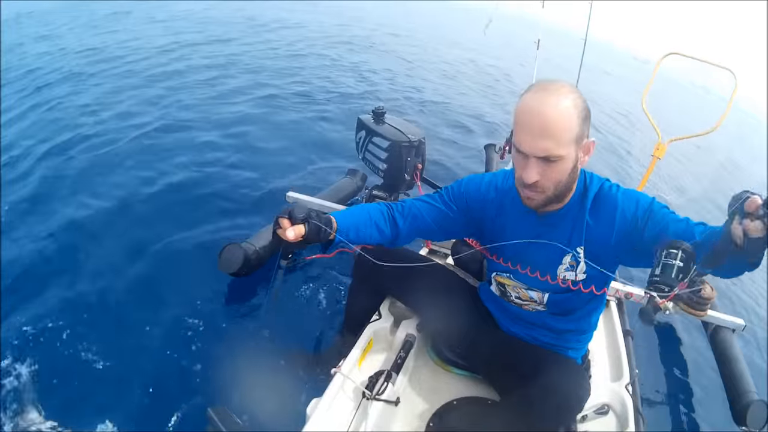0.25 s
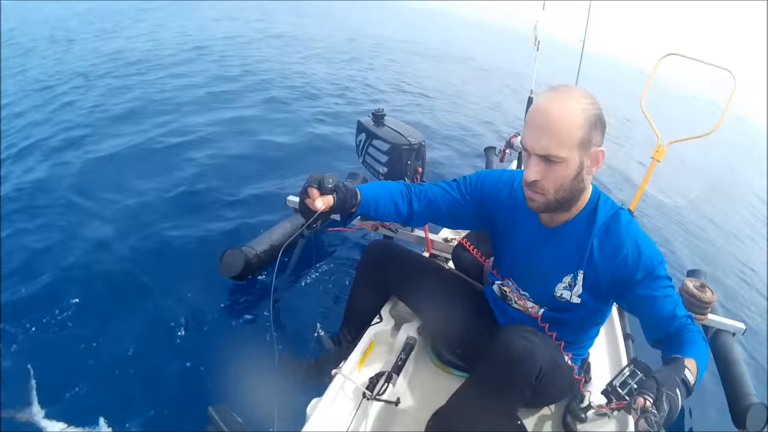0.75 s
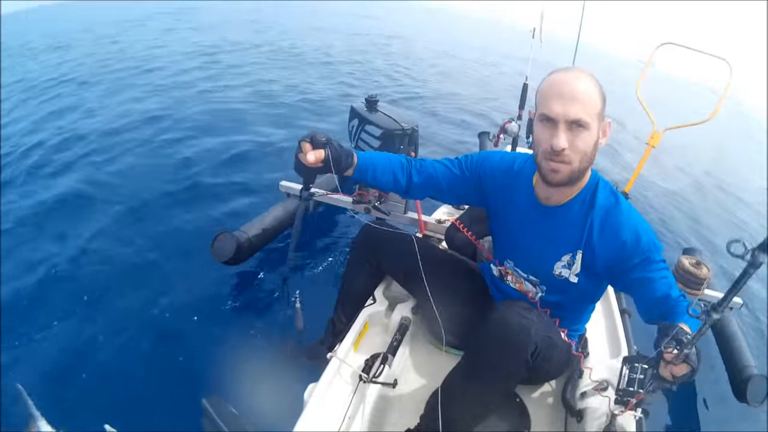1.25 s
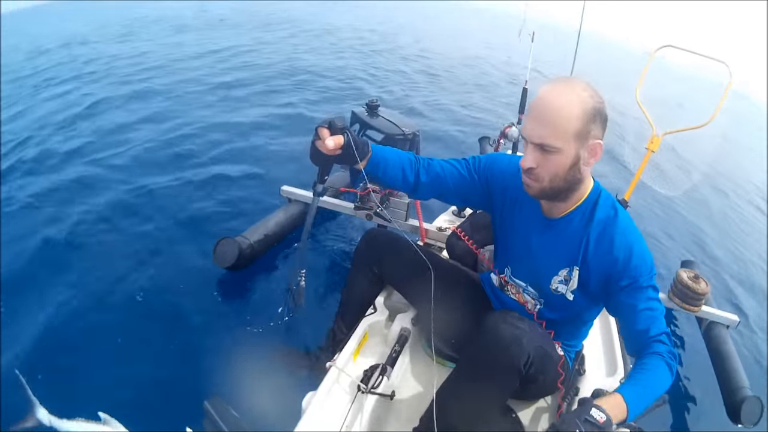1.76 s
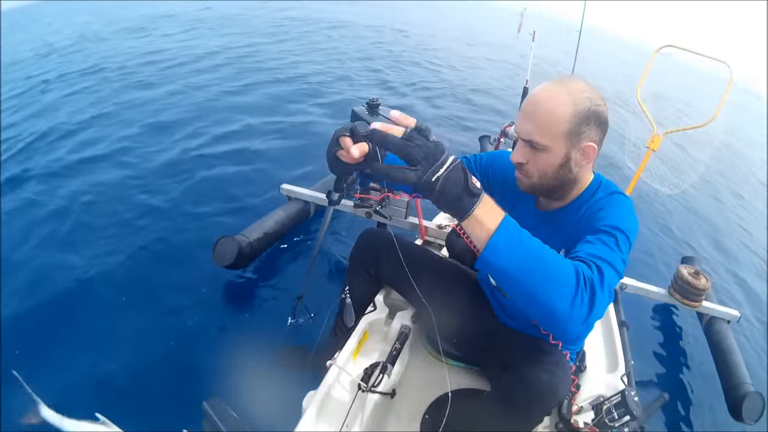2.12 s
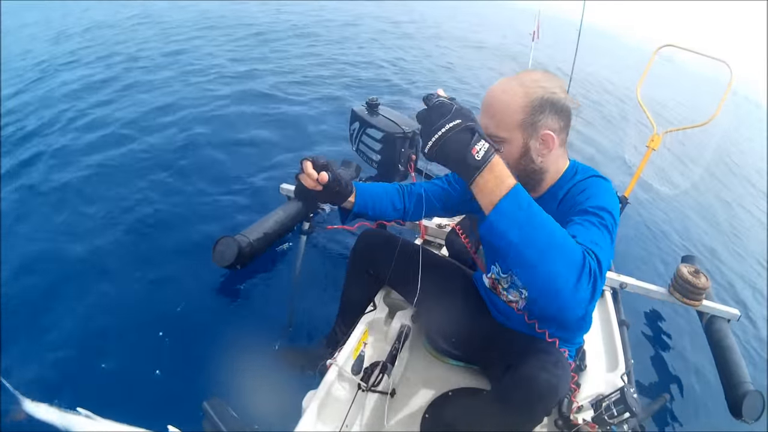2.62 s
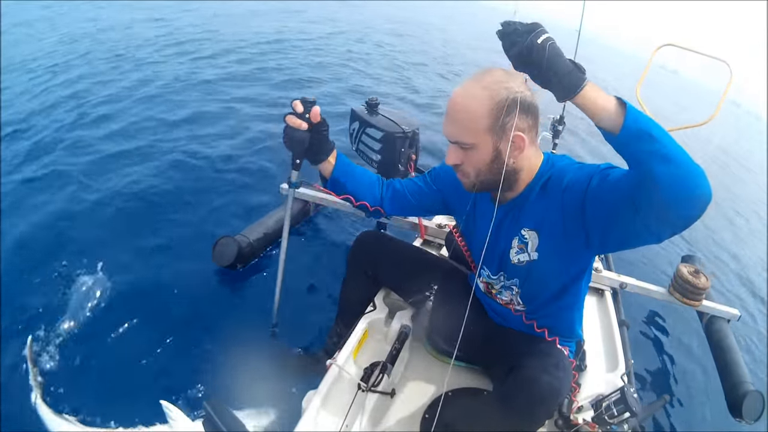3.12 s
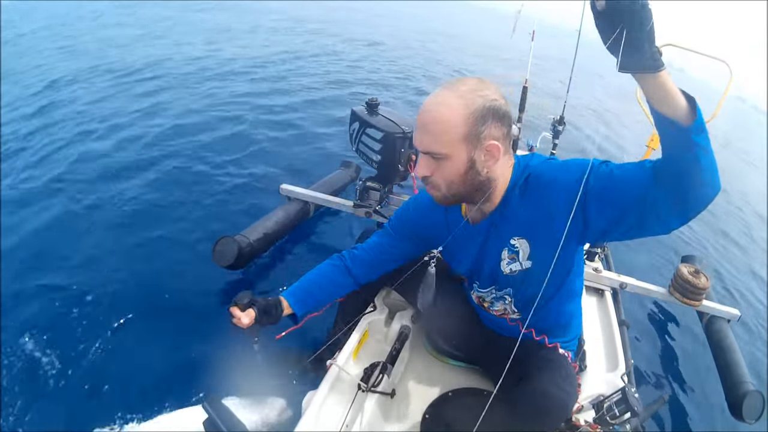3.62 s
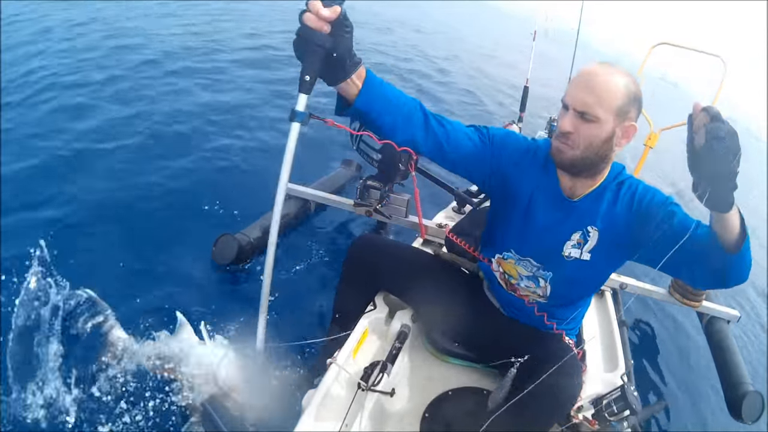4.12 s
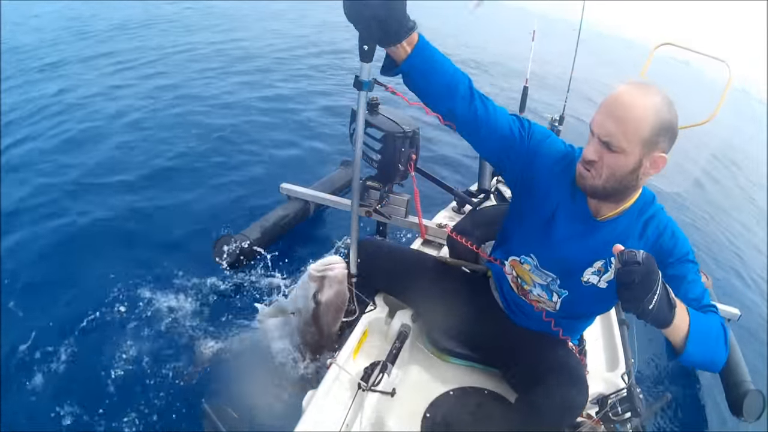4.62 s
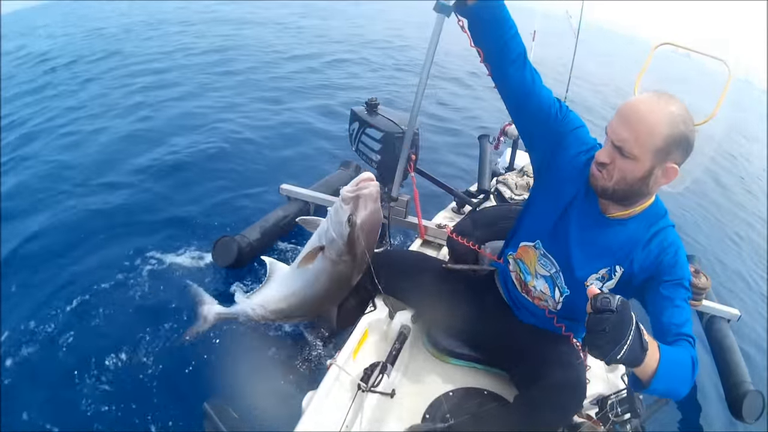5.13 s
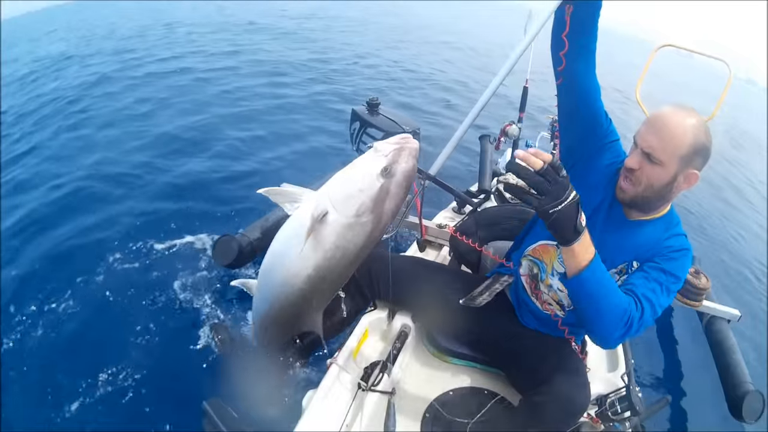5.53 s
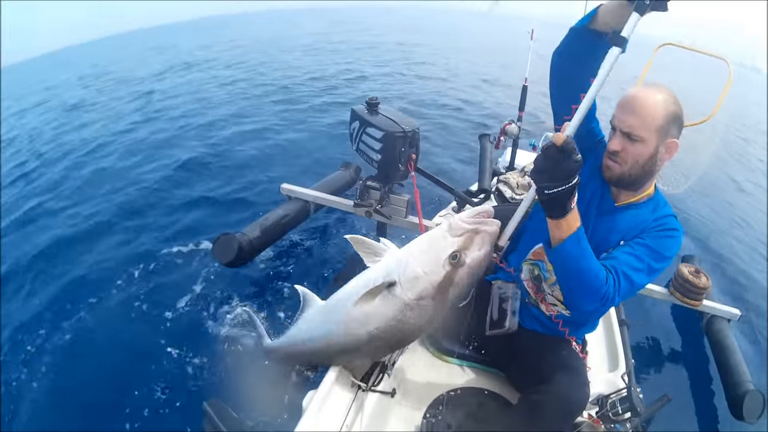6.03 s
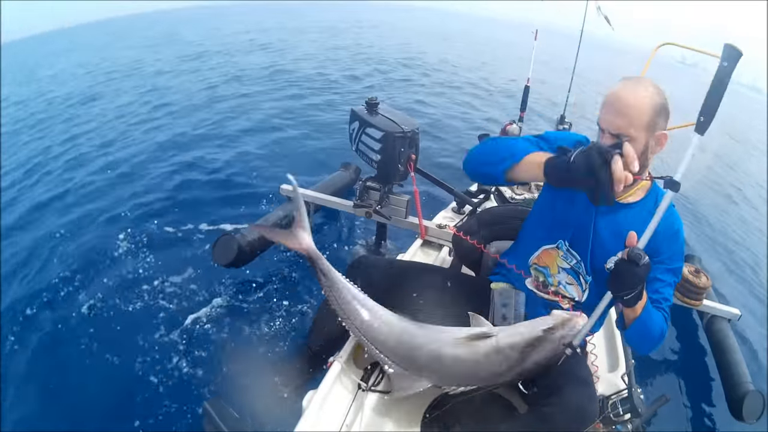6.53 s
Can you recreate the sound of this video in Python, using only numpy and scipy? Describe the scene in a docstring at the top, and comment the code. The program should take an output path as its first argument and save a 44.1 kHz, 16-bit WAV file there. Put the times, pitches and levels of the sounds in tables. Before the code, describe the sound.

A rod bangs harshly into its holder, clipping the microphone, then faint reel clicks give way to dull fish thumps and wet rubbing along a hollow hull.

```python
"""Rod and heavy fish on a kayak hull

A camera microphone, sealed in its housing on a plastic kayak, hears the hull through the mount.
Close by, a rod is banged into its holder, hard enough to overload the input, then its reel ratchet clicks faintly:
short rattles strike ringing modes. Gear rubs, then water and a heavy fish thump and drag along the hull:
single blows and streams of small slips. Most of it rings in the same hull modes, over low sway, faint squeaks
and a steady noise-band hiss of the electronics."""
import sys
import numpy as np
from scipy import signal
from scipy.io import wavfile

SR = 44100
rng = np.random.default_rng(int(sys.argv[2]) if len(sys.argv) > 2 else 0)


def decibels_to_gain(level_db):
    """Convert a level in decibels to a linear amplitude gain (20 dB per decade)."""
    exponent = np.asarray(level_db, float) / 20
    return 10 ** exponent


def transcribe(u):
    """Save the signal u as a 16-bit wav file named by the first command-line argument.

    u: samples, shape (n,) or (channels, n), limited to [-1, 1]; the rate is SR.
    q: integer samples, one column per channel.
    """
    v = np.clip(np.atleast_2d(u).T, -1, 1)
    q = np.round(v * 32767).astype(np.int16)
    wavfile.write(sys.argv[1], SR, q)


N = 298098   # length in samples

# slow rocking of the mount: start_s, level_db (straight lines between the points)
SWAY = [(0, -32.5), (0.35, -62.5), (0.55, -28), (0.8, -59), (0.95, -28), (1.2, -37), (1.45, -32.5),
        (1.9, -58), (2.4, -62.5), (3.82, -73), (3.95, -50.5), (4.3, -68.5), (6.76, -63.5)]
# faint whistles: start_s, end_s, pitch_hz, level_db (rms at the middle of the swell)
SQUEAKS = [(5.28, 5.48, 3000, -72), (5.29, 5.39, 3300, -77), (5.53, 5.59, 2000, -60)]

# Modes of hull and mount, low to high: pitch_hz, level_db (relative), t60_s (at damping 1)
BOOM = [(91.4, -12, 0.26), (163.9, 4, 0.12), (209.5, -9, 0.14), (280.4, 1, .05), (414.7, -11.5, 0.02)]
RING = [(447.2, -11, 0.067), (469.4, -4, 0.11), (546, 8, 0.038), (620, -4, 0.053), (766, 10, 0.045),
        (921, -5, 0.019)]
CLACK = [(1251, -4.5, 0.051), (1398, -0.5, 0.045), (1485, 6, 0.024), (1696, 6.5, 0.024), (2040, -8.5, 0.04),
         (2374, -14, 0.023)]
CRACK = [(2655, 3.5, 0.008), (3400, -2.5, 0.017), (4200, -2.5, 0.013), (4648, 1.5, 0.0047),
         (6350, 0, 0.0027), (8900, -8.5, 0.0014), (13500, -13.5, 0.0029)]
# gear dragged over the deck: pitch_hz, level_db (relative), t60_s (at damping 1)
GEAR = [(2730, -5, .015), (3702, -2.5, 0.013), (4170, -6.5, .012)]
# the rod holder's own modes: pitch_hz, level_db (relative), t60_s (at damping 1)
HOLDER = [(220, 3, 0.18), (674.6, 7.5, 0.076), (2165, -6.5, 0.032)]

# strokes of gear, water and fish along the hull: start_s, length_s, ring_db, boom_db, clack_db
STROKES = [(0, 0.036, -48, -33, -44.5), (0.045, 0.25, -61, -49.5, -60.5), (0.431, 0.021, -37, -32.5, -40),
           (0.534, 0.27, -35.5, -36.5, -41), (0.817, 0.49, -46, -35, -57), (1.36, 0.19, -55.5, -39, -59),
           (1.578, 0.269, -39, -35, -38.5), (1.942, 0.33, -47, -49, -52), (2.492, 0.14, -62, -35.5, -85),
           (2.735, 0.19, -75.5, -56.5, -91), (3.302, 0.32, -59, -62, -67), (3.88, 0.061, -59, -45, -69),
           (3.998, 0.25, -54, -49, -55.5), (4.308, 0.38, -54, -49, -61.5),
           (4.666, 0.089, -47.5, -32.5, -69), (4.834, 0.1, -49.5, -49.5, -64), (4.959, 0.14, -40, -34, -65),
           (5.22, 0.23, -44, -32.5, -61.5), (5.502, 0.12, -39, -34.5, -54), (5.643, 0.38, -48, -35, -62),
           (6.016, 0.37, -58, -42.5, -69), (6.356, 0.17, -54.5, -44.5, -67),
           (6.556, 0.18, -48.5, -41, -52.5)]
# dry scuffs that reach the highest modes: start_s, length_s, gear_db, edge_db
SCUFFS = [(0, 0.038, -51.5, -52), (0.55, 0.13, -43, -52.5), (0.743, 0.19, -59.5, -69),
          (0.929, 0.056, -43.5, -51), (1.587, 0.26, -50.5, -73), (1.657, 0.0053, -35.5, -50),
          (1.943, 0.31, -67, -91.5), (2.461, 0.03, -53, -66.5), (4.0, 0.28, -69, -89),
          (4.667, 0.024, -67.5, -77), (6.565, 0.17, -70, -81)]
# The next three hold one value for each of: boom, ring, clack, gear, sharp edge
# time to die to about a third after a stroke: fade_s
FADE_S = [0.038, 0.0077, 0.0094, 0.011, 0.011]
# calm water under everything: level_db
LAPPING_DB = [-61.5, -65, -81, -94, -100]
# scale of the unevenness of the slips: spread_db
UNEVEN_DB = [2.0, 3.2, 5.8, 6.5, 6.0]

# small hollow plops of water: start_s, peak_db
PLOPS = [(0.191, -29.5), (0.272, -39.5), (1.997, -36), (2.186, -29), (2.61, -37), (4.357, -34),
         (4.43, -35.5), (5.545, -29), (5.822, -31)]
# small dry ticks of reel and tackle, and the sharp edge of some hull blows: start_s, peak_db
TICKS = [(0.074, -41), (0.093, -40), (0.115, -43), (0.138, -39), (0.223, -36.5), (0.248, -41), (1.452, -27),
         (1.627, -26.5), (2.115, -38), (2.154, -41), (2.185, -49), (2.371, -43.5), (3.9256, -44.5),
         (4.361, -44.5), (4.41, -41), (4.487, -43.5), (4.529, -40), (4.676, -42), (4.689, -41.5),
         (4.588, -41), (5.364, -48), (5.596, -39), (5.745, -46)]
# blows and slaps on the hull: start_s, ring_peak_db, boom_peak_db, clack_peak_db, rattle_decay_ms
HULL_THUMPS = [(0.368, -43, -42, -48, 3), (1.696, -28, -17.5, -33, 0.24), (1.814, -24.5, -58, -21, 4.7),
               (1.843, -26.5, -20, -58, 23), (2.086, -21.5, -19, -23, 14.4),
               (2.426, -35.5, -40, -40.5, 2.4), (2.451, -17.5, -13, -28, 5), (2.527, -34, -20.5, -45, 3.7),
               (2.596, -35.5, -21.5, -42.5, 5.5), (2.687, -38, -25, -55, 6.4),
               (2.702, -38.5, -19.5, -63, 2.34), (3.02, -50.5, -48, -49, 3.3),
               (3.301, -46, -52.5, -50.5, 3), (3.845, -39.5, -52, -46, 4.5),
               (3.895, -43.5, -33.5, -49.5, 10), (4.014, -33, -32.5, -56, 4.3),
               (4.064, -35.5, -39, -39.5, 7.8), (4.114, -28.5, -50.5, -38.5, 6.5),
               (4.225, -55, -43.5, -46, 5.6), (4.336, -44, -47, -37, 1.8), (4.586, -16.5, -15, -21, 8.5),
               (4.657, -30, -17, -48.5, 5.5), (4.911, -37, -31.5, -62, 2.4),
               (4.961, -24.5, -24.5, -59, 2.6), (5.229, -27, -18, -35.5, 3), (5.262, -36, -30, -40, 5),
               (5.362, -20, -21, -38, 4.7), (5.594, -21, -18, -28.5, 4), (5.686, -34, -29.5, -45.5, 2.2),
               (5.744, -25, -19, -50, 4.3), (5.862, -18.5, -22, -66, 1.36), (5.947, -33, -33, -45, 3.4),
               (6.162, -35, -24, -47, 5.5), (6.367, -24, -16, -40, 18), (6.711, -26.5, -19, -45.5, 3.4)]
# the mount lurches: start_s, kick_db (start level of the dying sine)
LURCHES = [(0.516, -14), (0.579, -15.5), (0.623, -13), (0.941, 0), (1.087, -13.5)]
# single clear modes of rod or holder: start_s, pitch_hz, level_db (at the start, before flutter), t60_s
PINGS = [(.518, 645, -6.5, 0.13), (.53, 2150, -15, 0.19), (.664, 743, -2, 0.067), (.715, 631.5, -3.5, 0.11),
         (.992, 1530, -16.5, 0.046), (1.102, 1631, -2.5, 0.024), (1.135, 1563, 1, 0.033),
         (1.26, 1597, 2, 0.03), (1.261, 2010, -3, 0.019)]
# rod against holder, then from 1.32 s fainter clicks of the reel ratchet:
# start_s, ring_peak_db, clack_peak_db, crack_peak_db, rattle_decay_ms (scaled per family)
ROD_AND_REEL = [(0.428, -6.5, -3, -11, 2.85), (0.516, 0, 2.5, -0.5, 3.5), (0.532, -4, -1, -5, 4.2),
                (0.562, -9, -9, -34.5, 2.6), (0.575, 3.5, 5, -3.5, 4.3), (0.587, -3.5, 3, -9, 0.46),
                (0.596, -6.5, 3, -2.5, 0.25), (0.62, 5, 7.5, -6, 5.2), (0.639, -3.5, -11.5, -22.5, 6.6),
                (0.663, -6, 2, -12, 4.1), (0.714, 1, 7.5, -6.5, 3.8), (0.729, -4.5, -6.5, -17.5, 5.4),
                (0.828, -21, -18, -47, 6.6), (0.862, -28, -20.5, -35, 3.8), (0.876, 3, -0.5, -11, 5.1),
                (0.904, 2.5, 9, -8.5, 2.8), (0.917, -8, -3.5, -16.5, 4.2), (0.938, 5.5, -0.5, -16, 7.7),
                (0.95, 0.5, -5.5, -26, 9.4), (0.962, -4.5, -19.5, -37.5, 7.8),
                (0.991, -21.5, -27.5, -42.5, 6.9), (1.029, -32, -42, -32.5, 2.9),
                (1.075, -23.5, -21, -46, 5.4), (1.081, 1.5, -9.5, -17.5, 0.37),
                (1.09, -11, -2.5, -16.5, 1.9), (1.103, -8, -9.5, -16.5, 7.6),
                (1.135, -14.5, -8, -21.5, 7.6), (1.182, -31.5, -35.5, -38, 7.6),
                (1.196, -22, -22.5, -34, 7.6), (1.251, -23, -20.5, -34.5, 7.7), (1.26, -3, 7, -0.5, 0.98),
                (1.32, -35, -28, -30, 6.5), (1.343, -30, -26, -39, 2.7), (1.391, -24.5, -26, -29.5, 7.3),
                (1.466, -35.5, -27, -29, 9.3), (1.529, -35, -27.5, -30.5, 10),
                (1.577, -33.5, -29.5, -41.5, 4.9)]

MOUNT_LOW_HZ = 84   # the soft mount passes little of the modes below this
FIRST_TOUCH = 0.84   # first contact against the root energy of the whole rattle (ratio)
STROKE_ATTACK_S = 0.0091
LURCH_HZ, LURCH_T60_S = 64, 0.075
ROD_BOOM_DB, BOOM_LOST_PER_CLACK_DB = -4, 0.08   # boom against ring; a brighter knock booms less
HISS_DB, HISS_LOW_HZ, LOW_HISS_DB = -69.5, 1494, -68
OVERLOAD = 0.99   # input clips here (ratio of full scale)


def rms_one(x):
    """Scales a signal to an rms of 1."""
    return x / np.sqrt(np.mean(x ** 2) + 1e-20)


def band(x, low_hz, high_hz):
    """Keeps what lies between two frequencies."""
    return signal.sosfilt(signal.butter(2, [low_hz, high_hz], "band", fs=SR, output="sos"), x)


def drift(rate_hz):
    """Slow chance with rms 1: noise through a two-pole lowpass, its first second dropped."""
    r = np.exp(-2 * np.pi * rate_hz / SR)
    noise = rng.standard_normal(N + SR)
    return rms_one(signal.lfilter([1], [1, -2 * r, r * r], noise)[SR:])


def rings(modes, damping):
    """The dying sine of each mode, one row each, signs alternating, band-limited to the family's range."""
    hz, db, t60 = np.transpose(modes)[:, :, None]
    t = np.arange(SR // 3) / SR
    sines = decibels_to_gain(db - 60 * damping * t / t60) * np.sin(2 * np.pi * hz * t)
    signs = (-1) ** np.arange(len(modes))[:, None]
    kept = band(sines * signs, hz.min() * 0.7, hz.max() * 1.15)
    return band(kept, MOUNT_LOW_HZ, hz.max() * 1.25)


def blows(modes, times, peaks_db, decays_ms, damping):
    """Each blow is a short dying rattle that strikes the modes with strengths of its own."""
    shapes, out = rings(modes, damping), np.zeros(N + SR)
    t_ms = np.arange(SR // 20) * 1000 / SR
    for s, db, ms in zip(times, peaks_db, decays_ms):
        strengths = decibels_to_gain(3 * rng.standard_normal(len(modes)))
        rattle = rng.standard_normal(len(t_ms)) * np.exp(-t_ms / max(ms, 0.1))
        rattle[0] = FIRST_TOUCH * np.linalg.norm(rattle)   # one clean first contact leads
        sound = signal.fftconvolve(strengths @ shapes, rattle)
        # load and grip shift the modes a little from blow to blow
        stretch = 1 + rng.uniform(-0.05, 0.05)
        samples = np.arange(len(sound))
        sound = np.interp(samples * stretch, samples, sound, right=0)
        at = round(s * SR)
        out[at:at + len(sound)] += decibels_to_gain(db) * sound / np.abs(sound).max()
    return out[:N]


def preamp_hiss():
    """Hiss of the electronics: two overlapping bands of steady white noise."""
    high = rms_one(band(rng.standard_normal(N), HISS_LOW_HZ, 16000))
    low = rms_one(band(rng.standard_normal(N), 60, 1800))
    return decibels_to_gain(HISS_DB) * high + decibels_to_gain(LOW_HISS_DB) * low


def sway():
    """Rumble below the modes as the boat rocks: low noise that follows a level curve."""
    s, db = np.transpose(SWAY)
    level_db = np.interp(np.arange(N) / SR, s, db)
    return decibels_to_gain(level_db) * rms_one(band(rng.standard_normal(N), 6.7, 47))


def squeak():
    """Faint breathy whistles: noise twice through a narrow band."""
    t, out = np.arange(N) / SR, 0
    for start, end, hz, db in SQUEAKS:
        swell = np.sqrt(np.clip((t - start) * (end - t), 0, None)) * 2 / (end - start)
        tone = band(rng.standard_normal(N), hz - 50, hz + 50)
        tone = band(tone, hz - 50, hz + 50)
        out = out + decibels_to_gain(db) * swell * rms_one(tone)
    return out


def stroke_level(starts, lengths, levels_db, fade_s, floor_db):
    """Each stroke swells in just ahead of its start, holds and fades; powers add on a steady floor."""
    t, power = np.arange(N) / SR, decibels_to_gain(floor_db) ** 2
    for s, length, db in zip(starts, lengths, levels_db):
        rise = np.clip((t - s) / STROKE_ATTACK_S + 1, 0, 1)
        fade = np.exp(-np.clip(t - s - length, 0, 1) / fade_s)
        power = power + (decibels_to_gain(db) * rise * fade) ** 2
    return np.sqrt(power)


def rub():
    """Rubbing along the hull: clumped slips of uneven size keep the modes sounding."""
    s, length, ring_db, boom_db, clack_db = np.transpose(STROKES)
    scuff_s, scuff_length, gear_db, edge_db = np.transpose(SCUFFS)
    families = [(BOOM, 1.8, (s, length, boom_db)),   # modes, damping, strokes
                (RING, 1.8, (s, length, ring_db)),
                (CLACK, 1.6, (s, length, clack_db)),
                (GEAR, 1, (scuff_s, scuff_length, gear_db)),
                (CRACK[3:], 0.8, (scuff_s, scuff_length, edge_db))]
    out, clumps = 0, drift(8.8)   # all families feel the same lumps
    for (modes, damping, rows), fade_s, floor_db, uneven_db in zip(families, FADE_S, LAPPING_DB, UNEVEN_DB):
        happens = rng.random(N) < 2200 / SR   # about 2200 slips a second
        sizes_db = uneven_db * np.minimum(rng.exponential(1, N), 4)   # many light slips, a few strong ones
        slips = happens * decibels_to_gain(sizes_db) * rng.choice([-1, 1], N)
        slips = slips * decibels_to_gain(uneven_db * (0.51 * drift(23.0) + 0.55 * clumps))
        body = rings(modes, damping).sum(axis=0)
        unit = np.sqrt(np.mean(slips ** 2) * np.sum(body ** 2))   # expected rms of slips through the body
        driven = slips * stroke_level(*rows, fade_s, floor_db)
        out = out + signal.fftconvolve(driven, body)[:N] / unit
    return out


def plops():
    """Water slaps a hollow of the hull: only the upper ring modes speak."""
    s, db = np.transpose(PLOPS)
    return blows(RING[4:], s, db, 3.8 + 0 * s, damping=0.65)


def ticks():
    """Reel, tackle and the sharp edge of some hull blows ring only the high modes, heavily damped."""
    s, db = np.transpose(TICKS)
    duller = [(hz, level_db - 4.0, t60) for hz, level_db, t60 in CRACK[:4]]
    return blows(CLACK + duller, s, db, 3.2 + 0 * s, damping=22.0)


def hull_thumps():
    """Soft heavy contacts: mostly boom and ring, no crack modes."""
    s, ring_db, boom_db, clack_db, ms = np.transpose(HULL_THUMPS)
    boom = blows(BOOM, s, boom_db, ms, damping=0.75)
    ring = blows(RING, s, ring_db, ms, damping=0.55)
    return boom + ring + blows(CLACK, s, clack_db, ms, damping=1.8)


def lurches():
    """Heavy knocks shake the whole mount: a low sine that dies within a few cycles."""
    s, db = np.transpose(LURCHES)
    t, kicks = np.arange(SR // 4) / SR, np.zeros(N)
    kicks[(s * SR).astype(int)] = decibels_to_gain(db)
    shake = decibels_to_gain(-60 * t / LURCH_T60_S) * np.sin(2 * np.pi * LURCH_HZ * t)
    return signal.fftconvolve(kicks, shake)[:N]


def pings():
    """Knocks on one spot ring a single mode, swelling in over 2 ms; loose parts make it flutter."""
    out, t = np.zeros(N + SR), np.arange(SR // 4) / SR
    for s, hz, db, t60 in PINGS:
        at = round(s * SR)
        swell = np.minimum(t * 500, 1)
        out[at:at + len(t)] += decibels_to_gain(db - 60 * t / t60) * swell * np.sin(2 * np.pi * hz * t)
    return out[:N] * decibels_to_gain(2.5 * drift(90))


def rod_and_reel():
    """Close hits and ratchet clicks reach all families and the holder's own; the hand on the rod damps them."""
    s, ring_db, clack_db, crack_db, ms = np.transpose(ROD_AND_REEL)
    boom_db = ring_db + ROD_BOOM_DB - BOOM_LOST_PER_CLACK_DB * (clack_db - ring_db)
    boom = blows(BOOM + HOLDER[:1], s, boom_db, ms, damping=4.6)
    ring = blows(RING[4:] + HOLDER[1:2], s, ring_db, 1.2 * ms, damping=2.2)
    clack = blows(CLACK + HOLDER[2:], s, clack_db, ms, damping=2.2)
    crack = blows(CRACK, s, crack_db, 0.95 * ms, damping=3.2)
    return boom + ring + clack + crack


def scene():
    """All that reaches the microphone through the mount, as one channel."""
    background = sway() + squeak() + rub()
    small = plops() + ticks()
    heavy = hull_thumps() + lurches() + pings() + rod_and_reel()
    return (background + small + heavy)[None]


def band_limit(x):
    """A steep low-pass at the top of the band."""
    return signal.sosfilt(signal.butter(12, 15900, fs=SR, output="sos"), x)


def record(dry):
    """Preamp hiss is added, then the converter clips hard."""
    mix = np.clip(dry + preamp_hiss(), -OVERLOAD, OVERLOAD)
    return band_limit(mix)


dry = scene()
out = record(dry)
transcribe(out)
```